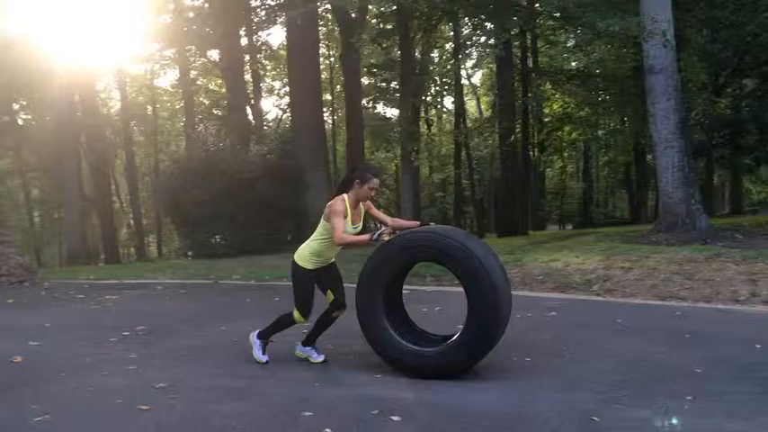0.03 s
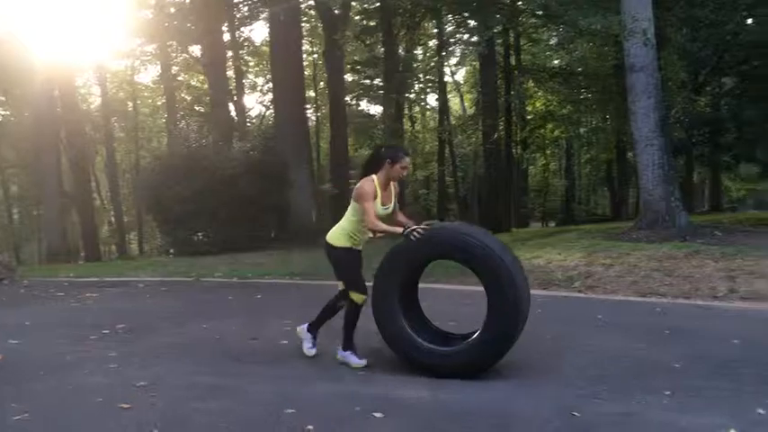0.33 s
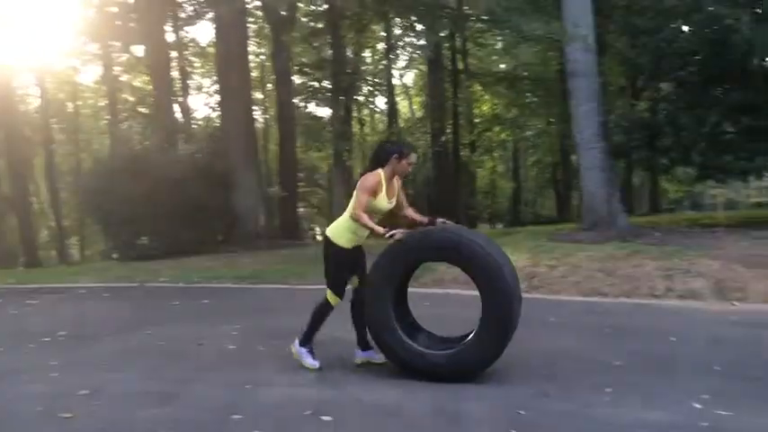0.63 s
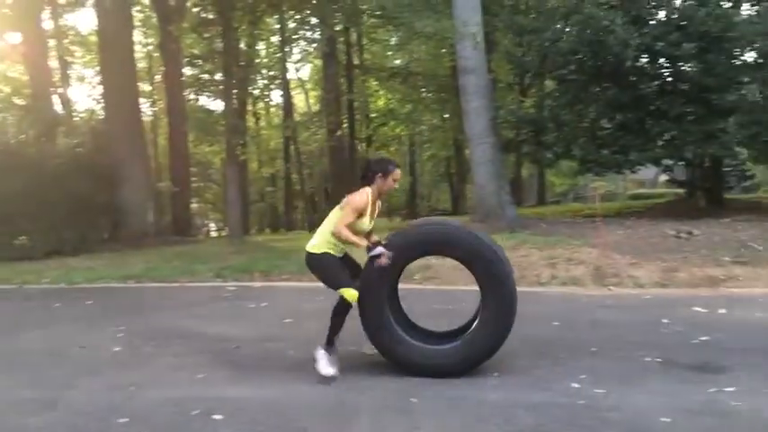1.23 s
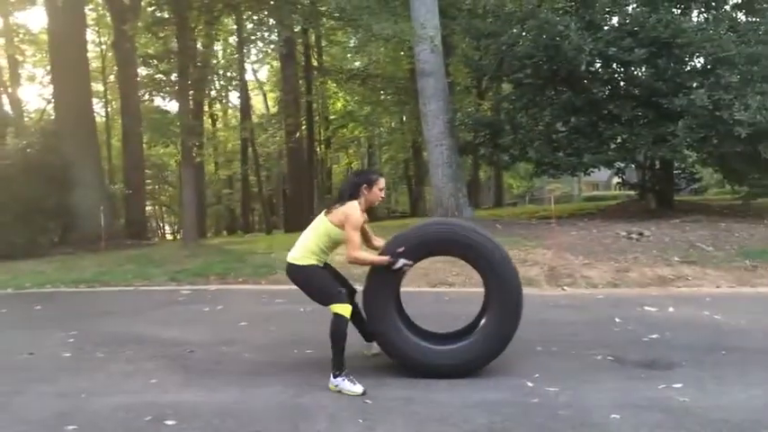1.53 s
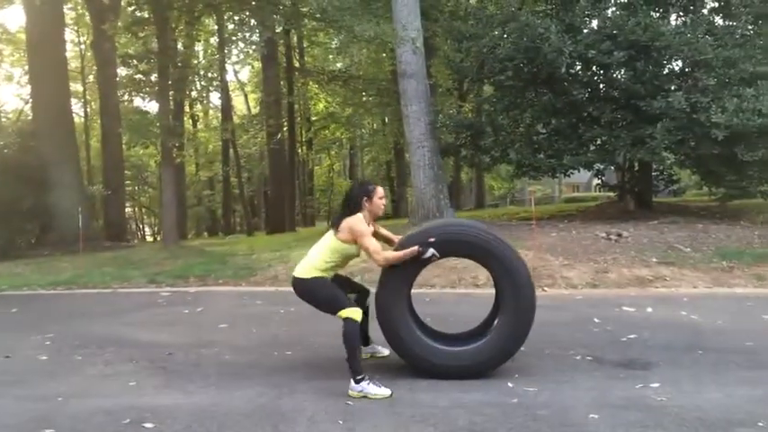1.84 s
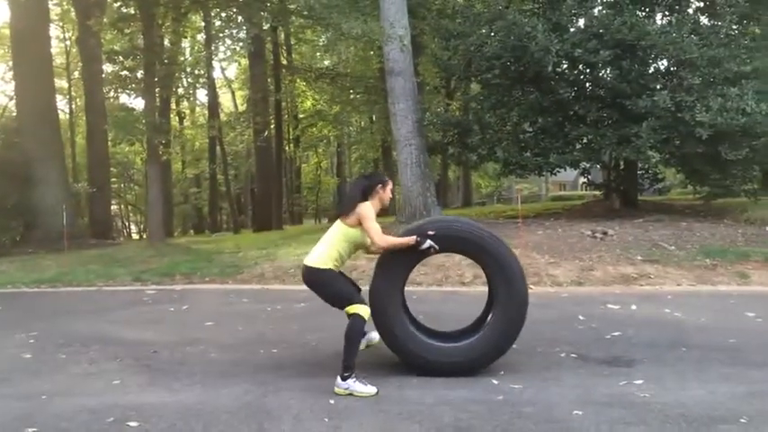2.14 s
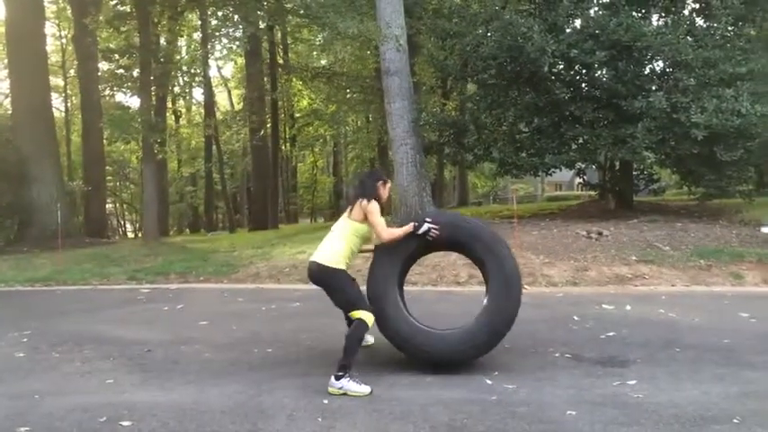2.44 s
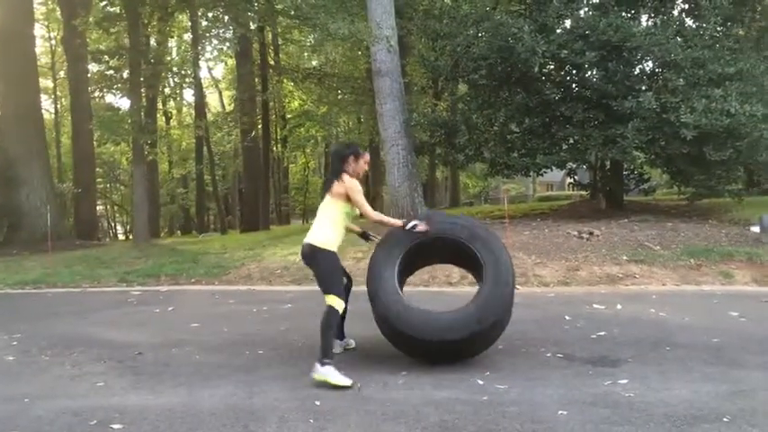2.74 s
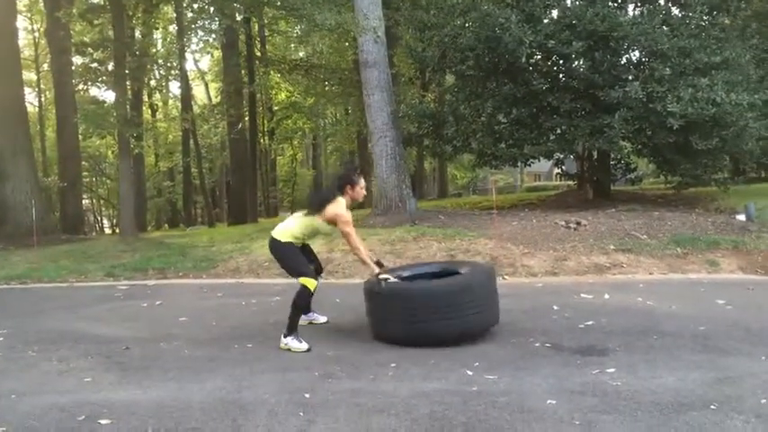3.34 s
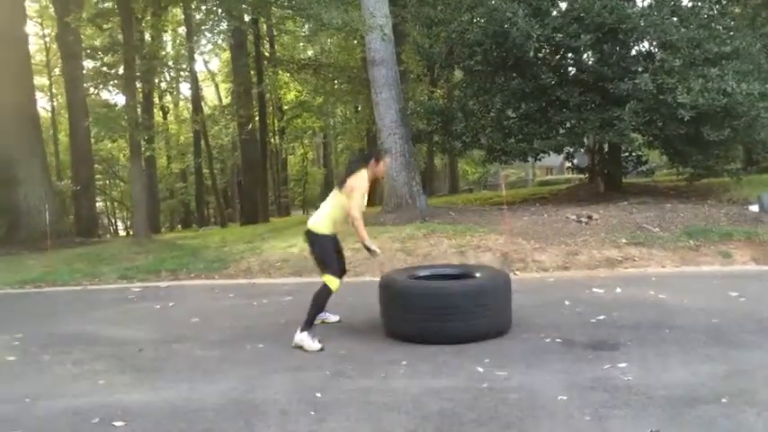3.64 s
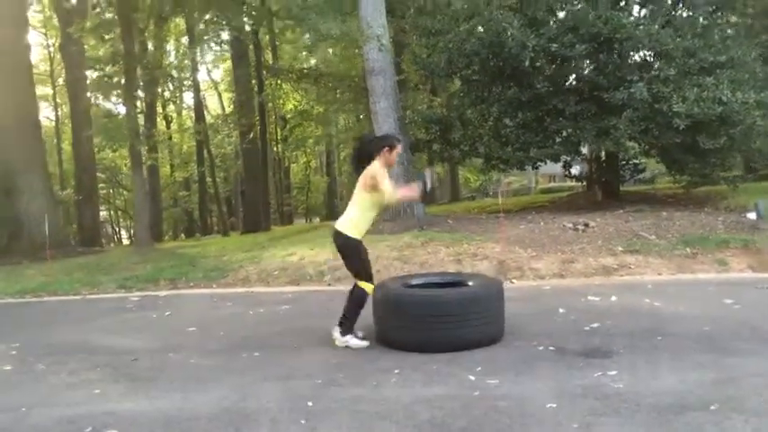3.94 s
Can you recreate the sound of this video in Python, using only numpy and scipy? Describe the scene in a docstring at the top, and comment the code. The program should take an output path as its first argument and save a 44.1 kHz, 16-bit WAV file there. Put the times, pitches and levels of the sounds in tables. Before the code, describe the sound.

A heavy tire dropping flat on asphalt is the main sound. First, shoes tap and scuff on grit nearby, with a firmer step at 1.9 seconds and small stones cracking around 2.6. At 3.2 seconds the tire lands with a slap and deep boom, bumps again softly around 3.5 and rings faintly; one more step comes near 4. Soft insects, occasional bird whistles and a low outdoor rumble continue behind.

```python
"""A heavy tire is rolled over asphalt, tipped and dropped flat: the tread slaps, the rubber body booms,
and it rocks and settles while the air inside rings on. Sports shoes tap and scuff on grit beside it.
In the woods behind, insects shrill in swells and birds whistle among echoing trees,
over a low outdoor rumble."""
import sys
import numpy as np
from scipy import signal
from scipy.fft import rfft, irfft, next_fast_len
from scipy.io import wavfile
from scipy.ndimage import map_coordinates

SR = 44100
rng = np.random.default_rng(int(sys.argv[2]) if len(sys.argv) > 2 else 0)


def inscribe(sig):
    """Save sig as 16-bit PCM at rate SR to the path in sys.argv[1].

    A 1-D sig is mono; a 2-D sig holds one channel per row.
    Samples are clipped to [-1, 1] before scaling.
    """
    pcm = np.round(np.clip(np.atleast_2d(sig).T, -1, 1) * 32767)
    wavfile.write(sys.argv[1], SR, pcm.astype(np.int16))


N = 176400


def tire():
    """Each landing squeezes the rubber body, which booms briefly and sets the air inside ringing."""
    # the tire meets the ground: start_s, boom_db, rise_s, hold_s, ring_db, upper_boost_db
    landings = [(3.2126, -6.5, 0.02, 0.017, -40.5, 2), (3.515, -23, 0.024, 0.035, -48, 14),
                (3.582, -22, 0.013, 0.032, -65, -15), (3.625, -21, 0.0077, 0.017, -55.5, 9.5)]
    # tones of the rubber body: pitch_hz, level_db, fade_s
    body_tones = [(51, -17.5, 0.23), (98.8, -1, 0.15), (182, -22.5, 0.083), (277.7, -27, 0.06)]
    # tones of the air inside and the free side wall: pitch_hz, level_db, fade_s
    ring_tones = [(106.2, 8.5, 1.07), (225.6, -5.5, 1.16), (358.9, 1, 1.28)]
    out = np.zeros(N)
    for start_s, boom_db, rise_s, hold_s, _, upper_boost_db in landings:
        t = since(start_s)
        for pitch_hz, level_db, fade_s in body_tones:
            if pitch_hz > 150:  # upper tones fade without a hold
                loudness = amp(upper_boost_db) * pulse(t, rise_s, fade_s)
            else:
                loudness = pulse(t, rise_s, fade_s, hold_s)
            out += amp(boom_db + level_db) * loudness * np.sin(2 * np.pi * pitch_hz * t)
    ring_time = since(landings[0][0])  # later landings feed the same ringing
    for pitch_hz, level_db, fade_s in ring_tones:
        loudness = sum(amp(ring_db + level_db) * pulse(since(start_s), rise_s=0.0039, fade_s=fade_s)
                       for start_s, _, _, _, ring_db, _ in landings)
        out += loudness * np.sin(2 * np.pi * pitch_hz * ring_time)
    return out


def tire_slaps():
    """The tread slaps the asphalt and the side wall claps down with a hollow knock."""
    # tread slaps: start_s, level_db, rise_s, fade_s
    slaps = [(3.193, -29.5, .017, 0.11), (3.25, -38.5, .016, 0.063), (3.513, -36, 0.03, 0.2),
             (3.531, -24, 0.0037, 0.0068)]
    # tone color of a slap: pitch_hz, level_db
    slap_color = [(185, 9), (450, -4.5), (640, 1.5), (820, -6), (1090, 0), (1700, -6), (2450, -19),
                  (3000, -26), (12000, -47)]
    # side wall knocks: start_s, pitch_hz, level_db
    knocks = [(3.2044, 1562, -27), (3.5308, 1117, -30.5)]
    out = noise(slap_color) * bursts(slaps)
    for start_s, pitch_hz, level_db in knocks:
        t = since(start_s)
        out += amp(level_db) * pulse(t, rise_s=0.0024, fade_s=0.028) * np.sin(2 * np.pi * pitch_hz * t)
    return out


def footsteps():
    """Heel, sole and edge of a shoe sound together; the sole's pitch depends on how flat it lands."""
    # a shoe meets the ground: start_s, heel_db, sole_db, edge_db, sole_pitch_hz
    steps = [(0.7691, -38, -36.5, -41.5, 830), (1.273, -45.5, -36, -30, 1050),
             (1.471, -32, -42.5, -42, 700), (1.517, -44.5, -36, -33, 750), (1.692, -40, -46, -45, 705),
             (1.7475, -45, -42, -29.5, 1010), (1.9058, -26, -24.5, -18, 680), (2.672, -33, -36, -42, 880),
             (2.683, -39, -49, -43, 795), (2.7936, -68, -47, -39.5, 1120), (3.038, -45.5, -39, -43, 856),
             (3.976, -34.5, -26.5, -28.5, 910)]
    # tone color of the heel's thump: pitch_hz, level_db
    heel_color = [(60, -24), (180, 8), (400, -2), (1200, -60)]
    # tone color of the slap of a sole pitched at 1000 Hz: pitch_hz, level_db
    sole_color = [(150, -24), (700, -9), (1000, 2), (1300, -7), (1750, -10), (3600, -43.5)]
    # tone color of the edge's click: pitch_hz, level_db
    edge_color = [(400, -18.5), (1200, -5), (2000, -1), (2500, -9), (3100, -24.5), (15000, -51.5)]
    out = np.zeros(N)
    for start_s, heel_db, sole_db, edge_db, sole_pitch_hz in steps:
        tuned_sole = [(hz * sole_pitch_hz / 1000, db) for hz, db in sole_color]
        out += amp(heel_db) * tap(start_s, heel_color, fade_s=0.093)
        out += amp(sole_db) * tap(start_s, tuned_sole, fade_s=0.06)
        out += amp(edge_db) * tap(start_s, edge_color, fade_s=0.029)
    return out


def tap(start_s, color, fade_s):
    """A sharp hit and a short chatter ring through one part of a shoe."""
    ring = response(color)
    t = np.arange(SR // 8) / SR
    chatter_gain = 0.13 / np.sqrt(np.linalg.norm(ring))
    force = chatter_gain * amp(-60 * t / fade_s) * rng.standard_normal(len(t))
    force[0] += 1  # the hit itself
    return np.pad(signal.fftconvolve(force, ring), (round(start_s * SR), N))[:N]


def grit():
    """Loose grit scrapes under shoes and rubber, and single stones crack under the tread."""
    # scrapes: start_s, level_db, rise_s, fade_s
    scrapes = [(0.439, -53, 0.005, 0.24), (0.906, -58.5, 0.011, 0.08), (1.285, -48, 0.0085, 0.06),
               (2.679, -47.5, 0.0069, 0.063), (2.818, -40.5, 0.0055, 0.066), (3.204, -33.5, 0.0047, 0.13),
               (3.277, -47.5, 0.0069, 0.023)]
    # tone color of a scrape: pitch_hz, level_db
    scrape_color = [(300, -9), (1200, 5.5), (2200, 7), (3000, -5.5), (4800, -3.5), (15000, -24.5)]
    # cracking stones: start_s, level_db
    cracks = [(1.803, -47), (2.531, -48.5), (2.562, -48.5), (2.587, -47), (2.62, -37), (2.669, -47)]
    # tone color of a crack: pitch_hz, level_db
    crack_color = [(1000, 1.5), (2450, 16), (3300, -10), (6000, 2.5), (15000, -13)]
    spiky_noise = unit(noise(scrape_color) * amp(3.5 * wobble(900)))
    cracking = sum(amp(level_db) * pulse(since(start_s), rise_s=0.0016, fade_s=0.0076)
                   for start_s, level_db in cracks)
    return spiky_noise * bursts(scrapes) + noise(crack_color) * cracking


def birds():
    """One bird repeats a falling two-voiced whistle, a farther one sings thin notes; the trees echo."""
    # whistles: start_s, length_s, pitch_hz, level_db, overtone_db, lower_voice_ratio, lower_voice_db
    whistles = [(0.263, 0.22, 3406, -50, -17, .745, -13.5), (1.815, 0.36, 3395, -56.5, -13.5, .865, -10.5),
                (3.365, .35, 3356, -54, -23.5, .865, -14)]
    # thin notes: start_s, length_s, pitch_hz, level_db
    thin_notes = [(1.098, 0.24, 3790, -61.5), (3.715, 0.29, 3770, -63.5)]
    song = np.zeros(N)
    for start_s, length_s, pitch_hz, level_db, overtone_db, lower_ratio, lower_db in whistles:
        loudness, phase = bird_note(start_s, length_s, pitch_hz,
                                    glide_hz=-330, rise_s=0.12, waver_hz=70, flick_hz=1100)
        upper_voice = np.sin(phase) + amp(overtone_db) * np.sin(2 * phase)
        lower_voice = amp(lower_db) * np.sin(lower_ratio * phase)
        song += amp(level_db) * loudness * np.sqrt(2) * (upper_voice + lower_voice)
    for start_s, length_s, pitch_hz, level_db in thin_notes:
        loudness, phase = bird_note(start_s, length_s, pitch_hz,
                                    glide_hz=78.6, rise_s=0.027, waver_hz=110)
        song += amp(level_db) * loudness * np.sqrt(2) * np.sin(phase)
    echo = np.pad(tree_echo(song), (round(0.045 * SR), 0))[:N]  # arrives 45 ms late
    return amp(-3) * song + amp(-5) * echo


def bird_note(start_s, length_s, pitch_hz, glide_hz, rise_s, waver_hz, flick_hz=0):
    """Loudness and phase of a note: it may flick up to pitch, then glides and grows rougher."""
    t = since(start_s)
    progress = np.minimum(t / length_s, 1)
    flick = flick_hz * np.exp(-t / 0.012)
    waver = waver_hz * progress * wobble(450)
    pitch = pitch_hz - flick + glide_hz * progress + waver
    fade_out = np.clip((length_s - t) / 0.056, 0, 1)
    flutter = amp(2.5 * wobble(40))
    return fade_in(t, rise_s) * fade_out * flutter, 2 * np.pi * np.cumsum(pitch) / SR


def insects():
    """A fluttering chorus, nearer insects swelling out of it, and a high hiss that rises and sinks."""
    # tone color of the chorus: pitch_hz, level_db
    chorus_color = [(3000, -40), (3600, -16), (4280, 4), (4750, -5.5), (5400, -13.5), (10000, -40)]
    # swells of the nearer insects: start_s, length_s, level_db
    swells = [(0, .3, -53.5), (1.463, 0.75, -53), (2.26, 0.48, -60), (2.83, 0.38, -53.5)]
    # their narrow, shrill tone color: pitch_hz, level_db
    swell_color = [(4050, -29.5), (4280, -2), (4480, 0), (4650, -9.5), (5200, -42)]
    # loudness of the hiss over time: time_s, level_db
    hiss_levels = [(.3, -76.5), (.56, -62), (1.0, -51.5), (1.65, -61.5), (2.06, -59.5), (2.4, -73),
                   (2.75, -71.5), (3.0, -60.5), (3.3, -79), (3.57, -63.5), (3.85, -74.5)]
    # tone color of the hiss: pitch_hz, level_db
    hiss_color = [(2500, -12.5), (5000, -0.5), (6500, -4.5), (8500, -5), (10000, -11), (11800, -6.5),
                  (15000, -5)]
    chorus = noise(chorus_color) * amp(-58.5 + 1.52 * wobble(60) + 0.62 * wobble(5.36))
    swelling = sum(amp(level_db) * np.sin(np.pi * np.minimum(since(start_s) / length_s, 1))
                   for start_s, length_s, level_db in swells)
    shrill = noise(swell_color) * swelling
    hiss_db = np.interp(since(0), *np.transpose(hiss_levels))
    hiss = noise(hiss_color) * amp(hiss_db + 1.23 * wobble(90))
    return chorus + shrill + hiss


def tree_echo(sound):
    """Sound bounces among the tree trunks, each pitch dying away at its own speed."""
    # how long the echo lasts: pitch_hz, fade_s
    fade_times = [(1000, 0.44), (3200, 1.02), (10000, 0.58)]
    hz, t, spectrum = signal.stft(rng.standard_normal(SR), SR, nperseg=256)
    fading = amp(-60 * t / along(fade_times, hz)[:, None])
    tail = signal.istft(spectrum * fading, SR, nperseg=256)[1]
    return signal.fftconvolve(sound, tail / np.linalg.norm(tail))[:N]


def rumble():
    """A low, steady outdoor noise."""
    # tone color of the rumble: pitch_hz, level_db
    rumble_color = [(25, -11), (108, 0), (186, -11.5), (400, -25.5), (1600, -31), (2700, -39.5),
                    (15000, -61)]
    return noise(rumble_color) * amp(-49)


def amp(db):
    """Turn decibels into a gain."""
    return 10 ** (np.asarray(db) / 20)


def unit(sound):
    """Scale a sound to an average (rms) level of 1."""
    return sound / np.sqrt(np.mean(sound ** 2) + 1e-20)


def along(points, hz):
    """Read between (pitch_hz, value) points on a logarithmic pitch scale."""
    pitches, values = np.transpose(points)
    return np.interp(np.log(hz + 1), np.log(pitches + 1), values)


def since(start_s):
    """Seconds since start_s, zero before it."""
    return np.maximum(np.arange(N) / SR - start_s, 0)


def wobble(rate):
    """A smooth random curve through `rate` points a second."""
    return map_coordinates(rng.standard_normal(int(N * rate / SR) + 4), [np.arange(N) * rate / SR])


def noise(color):
    """Noise of level 1 with the given tone color."""
    gains = amp(along(color, np.fft.rfftfreq(N, 1 / SR)))
    return unit(irfft(rfft(rng.standard_normal(N)) * gains, N))


def response(color, size=4096):
    """The short ring after one sharp hit, with the given tone color and a peak of 1."""
    log_gains = np.log(amp(along(color, np.fft.rfftfreq(size, 1 / SR))))
    folded = irfft(log_gains)
    # folding the second half onto the first puts all the ringing after the hit
    folded[1:size // 2] *= 2
    folded[size // 2 + 1:] = 0
    ring = irfft(np.exp(rfft(folded)))
    return ring / np.abs(ring).max()


def fade_in(t, rise_s):
    """A smooth rise from 0 to 1."""
    return np.sin(np.pi / 2 * np.minimum(t / rise_s, 1)) ** 2


def pulse(t, rise_s, fade_s, hold_s=0):
    """Loudness that rises, holds, then drops by 60 dB every fade_s."""
    return fade_in(t, rise_s) * amp(-60 * np.maximum(t - rise_s - hold_s, 0) / fade_s)


def bursts(rows):
    """A loudness curve with one pulse for each row."""
    return sum(amp(level_db) * pulse(since(start_s), rise_s, fade_s)
               for start_s, level_db, rise_s, fade_s in rows)


def scene():
    """Tire and feet close by, woods and low rumble behind."""
    near = tire() + tire_slaps() + footsteps() + grit()
    bass_cut = signal.butter(2, 300, "high", fs=SR, output="sos")
    echo = amp(-13.5) * tree_echo(signal.sosfilt(bass_cut, near))
    background = rumble() + birds() + insects()
    return (near + echo + background)[None]


def record(dry):
    """The microphone opens after 0.12 s and keeps nothing above 15500 Hz."""
    opened = dry * np.minimum(since(0.12) / 0.003, 1)
    size = next_fast_len(N + SR // 2)
    kept = np.fft.rfftfreq(size, 1 / SR) < 15500
    return irfft(rfft(opened, size) * kept, size)[..., :N]


dry = scene()
out = record(dry)
inscribe(out)
```